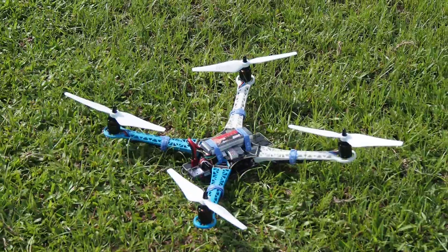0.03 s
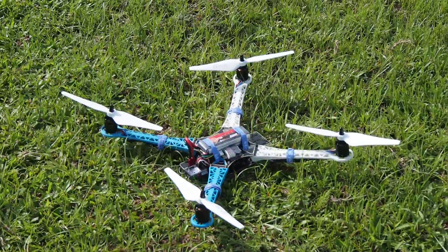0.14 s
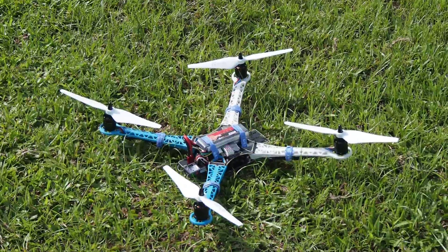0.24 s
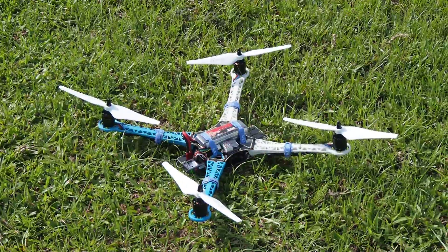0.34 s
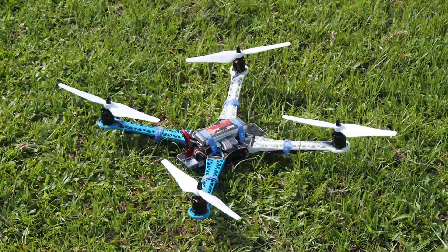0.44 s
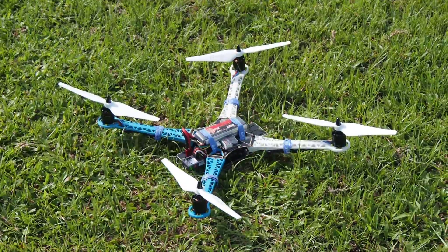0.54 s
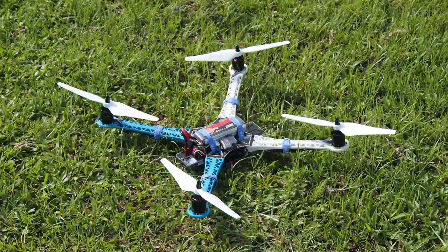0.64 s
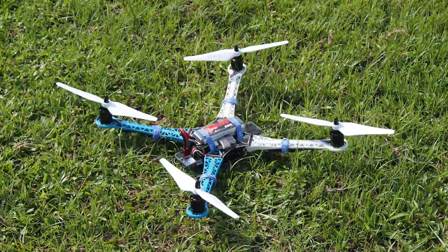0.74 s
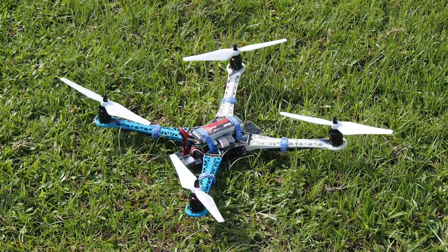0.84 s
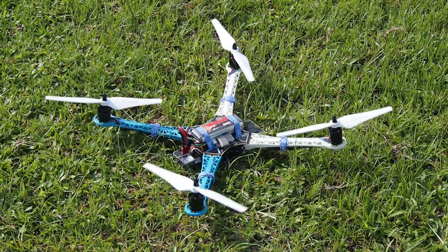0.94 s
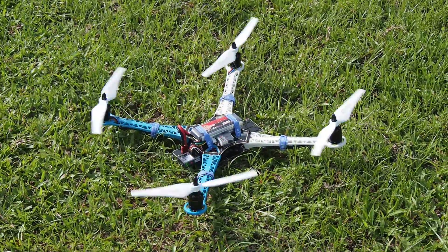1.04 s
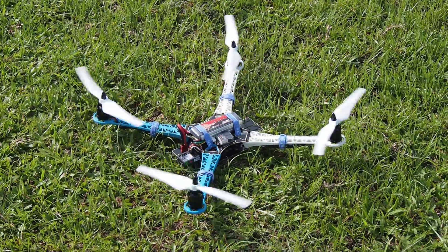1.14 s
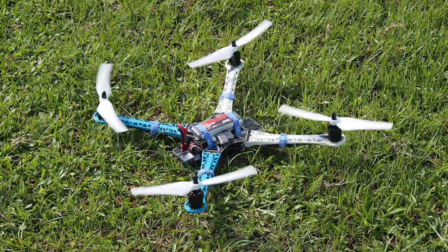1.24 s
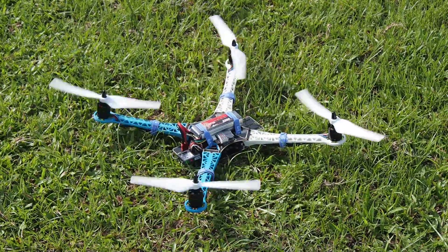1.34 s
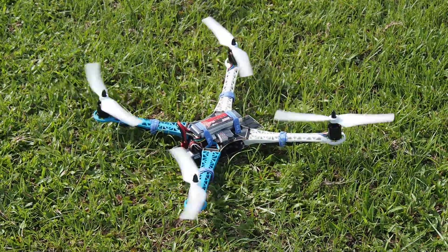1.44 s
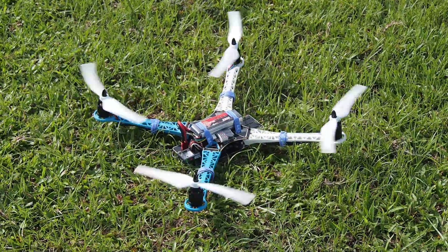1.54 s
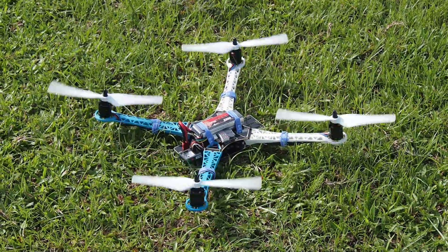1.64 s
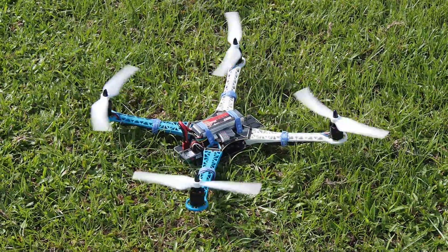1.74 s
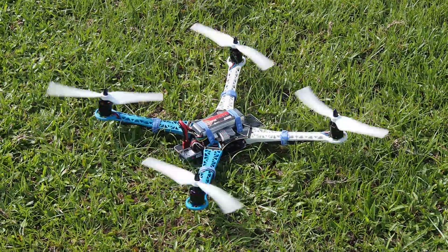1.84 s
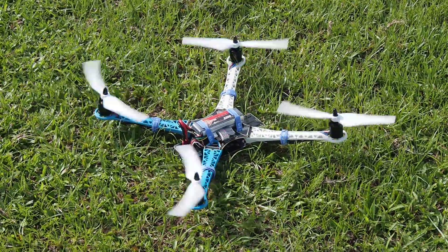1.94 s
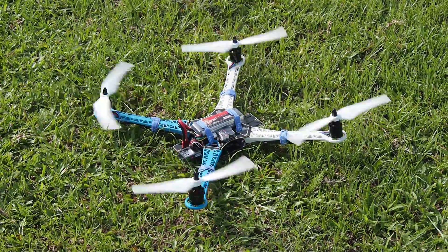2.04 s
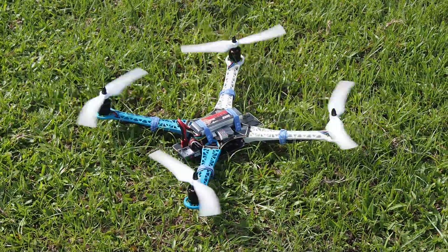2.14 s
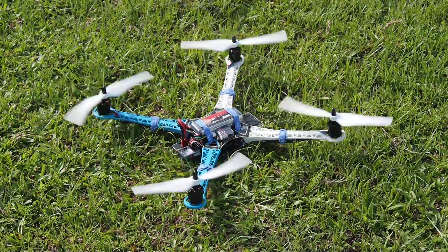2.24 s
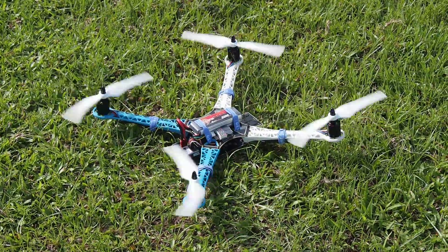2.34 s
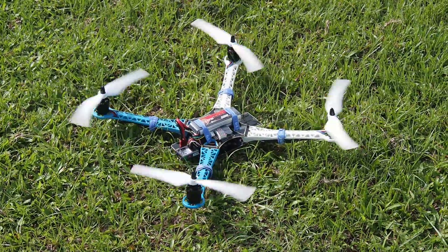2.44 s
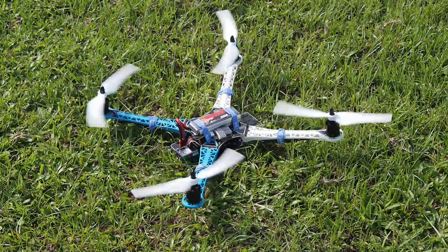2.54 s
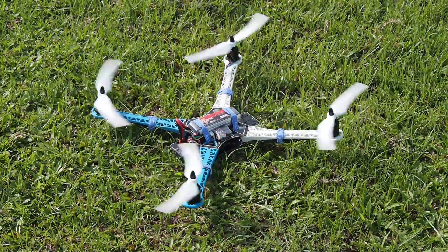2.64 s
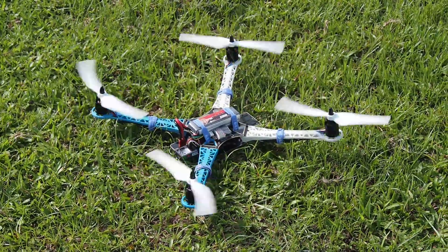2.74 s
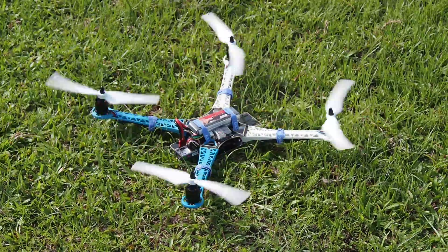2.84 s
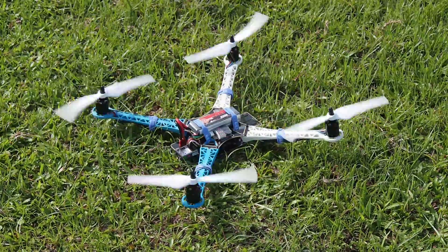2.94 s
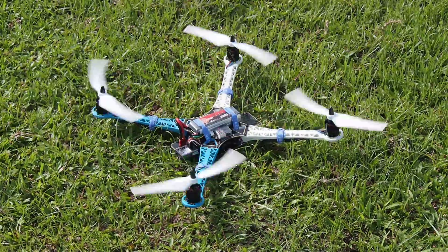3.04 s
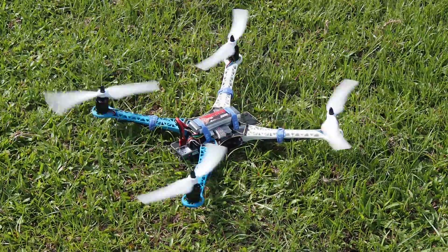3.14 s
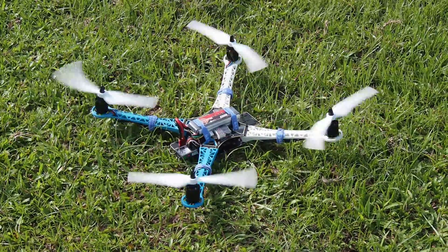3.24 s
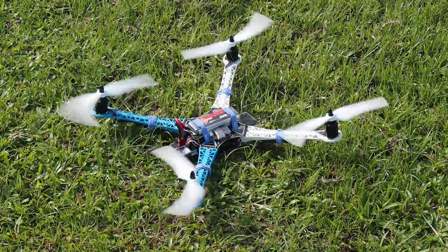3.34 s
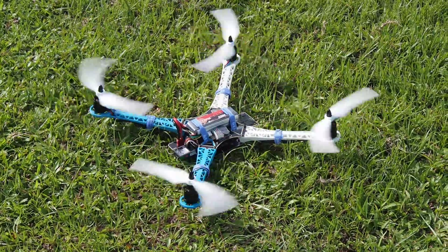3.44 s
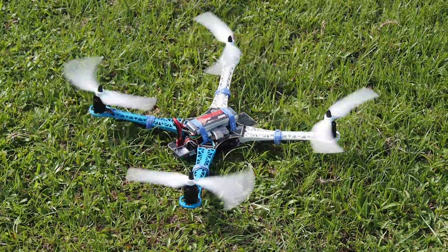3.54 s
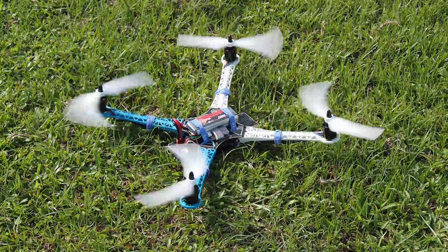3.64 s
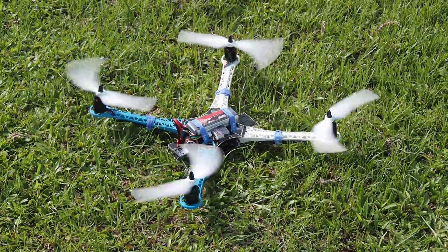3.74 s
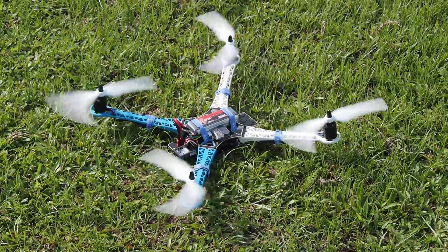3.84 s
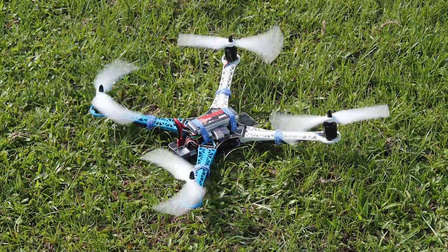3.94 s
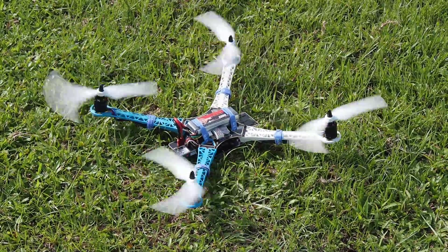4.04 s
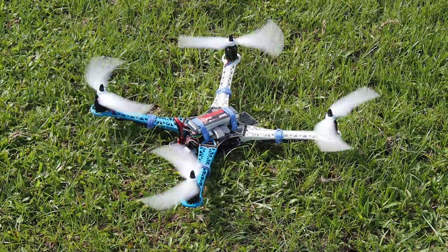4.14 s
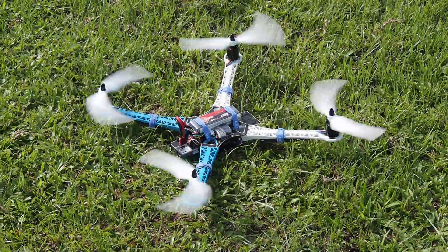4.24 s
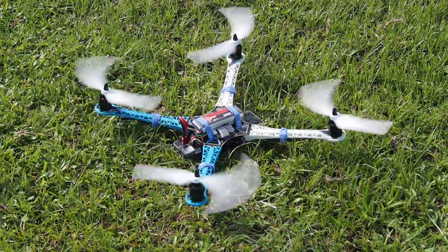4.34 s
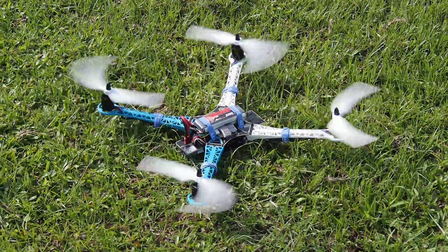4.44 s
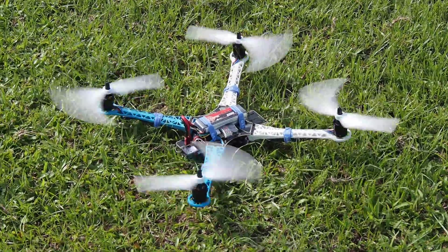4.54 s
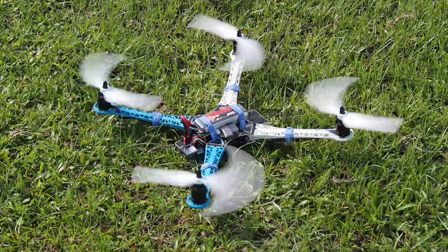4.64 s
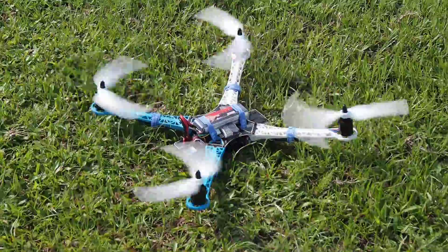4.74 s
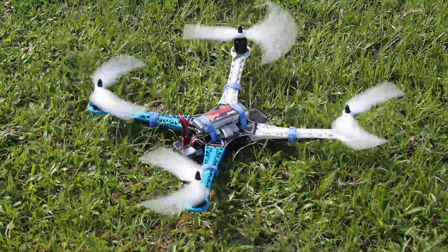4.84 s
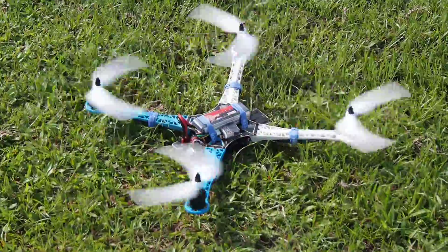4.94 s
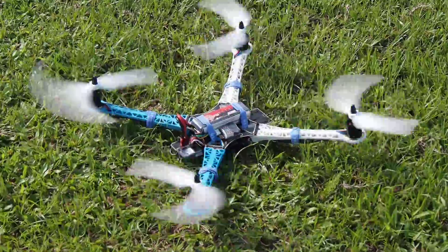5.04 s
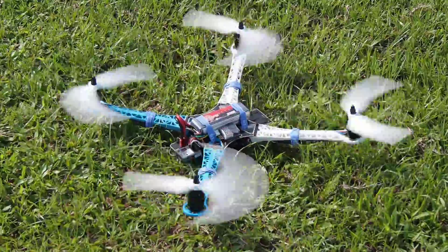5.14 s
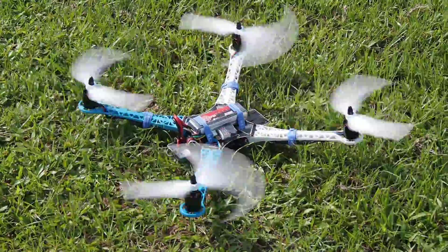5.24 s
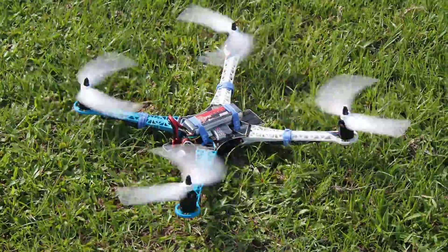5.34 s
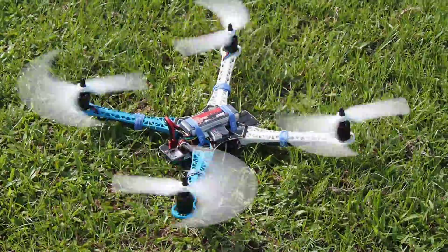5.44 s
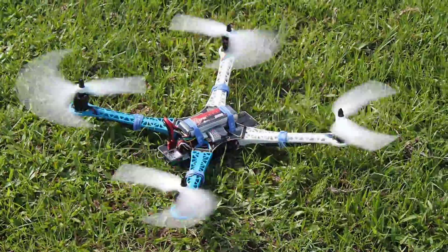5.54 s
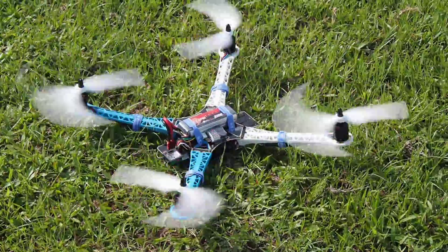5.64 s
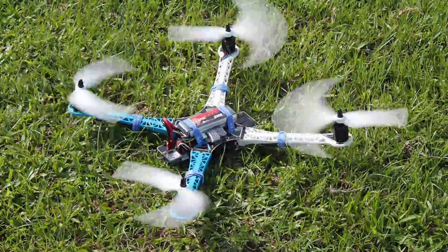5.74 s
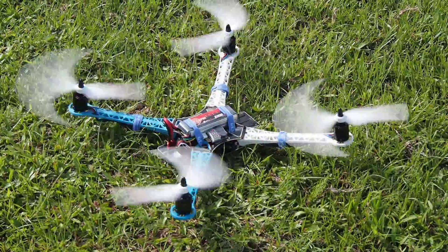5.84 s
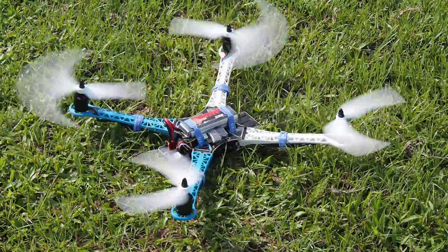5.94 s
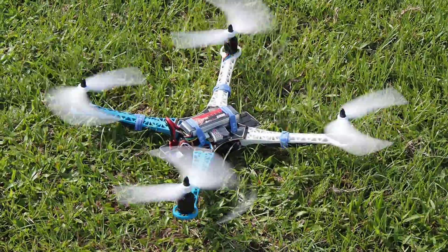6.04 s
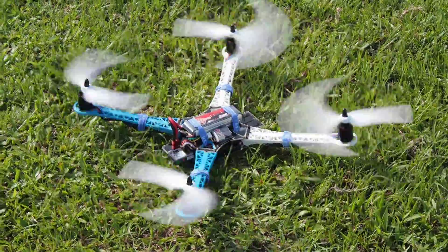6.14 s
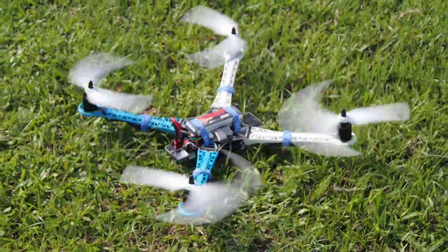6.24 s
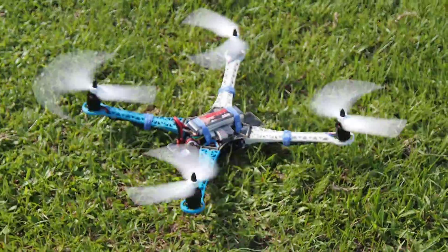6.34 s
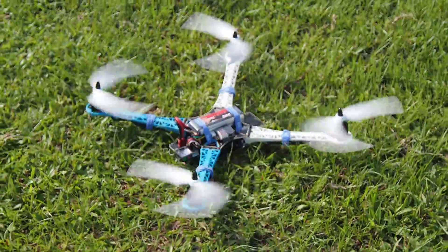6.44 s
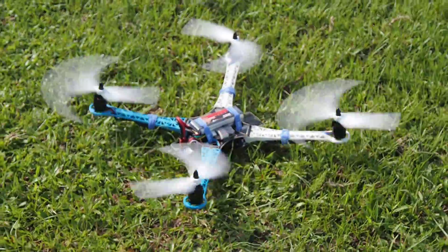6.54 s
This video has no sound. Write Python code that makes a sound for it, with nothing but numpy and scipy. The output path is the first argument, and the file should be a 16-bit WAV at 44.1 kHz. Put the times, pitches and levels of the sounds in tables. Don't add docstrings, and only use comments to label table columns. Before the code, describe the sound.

A quadcopter on grass spins up outdoors: piercing steady whine, gliding side tones, blades snapping against stalks, then airy propeller roar that swells to the end.

```python
import sys
import numpy as np
from scipy import signal
from scipy.fft import rfft, irfft, next_fast_len
from scipy.io import wavfile
from scipy.ndimage import map_coordinates

SR = 44100
rng = np.random.default_rng(int(sys.argv[2]) if len(sys.argv) > 2 else 0)


def inscribe(sig):
    pcm = np.round(np.clip(np.atleast_2d(sig).T, -1, 1) * 32767)
    wavfile.write(sys.argv[1], SR, pcm.astype(np.int16))


def boost_factor(decibels):
    exponent = np.asarray(decibels, float) / 20
    return 10 ** exponent


N = 290883
T = np.arange(N) / SR

# motor level in dB, left-right balance in dB, blade level in dB.
ROTORS = [(-3, 0, -3), (-8, -3, -1), (-7, 2, -5)]
# pitch in Hz, level in dB.
CLOCKS = [(8010.8, 0), (8015.87, -3), (8005.73, -7)]
# magnet rate in Hz, then switching tone, housing ring,
# side tones and cogging in dB.
MOTOR_LEVELS = [(10, -47, -49, -47, -72), (199, -44, -46.5, -46.5, -58), (310, -49.5, -44, -45.5, -55.5),
                (348, -45, -47.5, -47, -58.5), (465, -37, -35.5, -36.5, -58), (500, -35, -33.5, -40.5, -60),
                (740, -38.5, -37.5, -40, -50), (946, -41, -32.5, -33.5, -41), (1130, -37, -53, -39.5, -63),
                (1240, -46, -46, -43, -60)]
# offset in multiples of the shaft rate, level in dB.
SIDE_TONES = [(14, 0), (-14, -2), (1, -5), (-1, -2), (-2, -7)]
# centre in Hz, width in Hz, level in dB.
HOUSING = [(1180, 150, 0), (4682, 150, 6), (4920, 71, 4.5), (5170, 220, -8.5), (8010, 370, 5.5),
           (8570, 260, 2)]
# start and end in seconds, start and end pitch in Hz, level in dB.
SQUEALS = [(1.68, 1.78, 1540, 1555, -58), (1.81, 1.88, 2620, 2740, -51), (1.99, 2.06, 2950, 3030, -53),
           (2.17, 2.24, 2680, 2700, -56), (3.96, 4.12, 4750, 4760, -40), (4.01, 4.2, 4990, 4720, -38),
           (4.46, 4.64, 4720, 4760, -38), (4.48, 4.64, 4940, 4960, -40), (4.54, 4.63, 4630, 4570, -36),
           (4.66, 4.8, 4590, 4610, -35), (4.84, 4.92, 4590, 4610, -35), (6.02, 6.22, 4860, 5060, -37)]


def motors():
    whine_db, ring_db, side_db, cog_db = at_speed(MOTOR_LEVELS)
    in_step_s = 1.3
    waver = 0.5 * wobble(30)
    out = np.zeros((2, N))
    for angle, (motor_db, pan_db, _), (clock_hz, clock_db) in zip(shaft_angles(), ROTORS, CLOCKS):
        switching = 2 * np.pi * clock_hz * (T - in_step_s)
        whine_gain = boost_factor(whine_db + clock_db + 0.63 * wobble(5.88))
        whine = np.sqrt(2) * whine_gain * np.cos(switching + waver)
        side_tones = sum(boost_factor(level_db) * tone(switching + k * angle, drift=0.4, flutter_db=2.5, rate=25)
                         for k, level_db in SIDE_TONES)
        cogging = tone(84 * angle, drift=0.6, flutter_db=3, rate=20)
        magnets = boost_factor(motor_db + side_db) * side_tones + boost_factor(motor_db + cog_db) * cogging
        out += whine + placed(magnets, pan_db)
    ring_gain = boost_factor(ring_db + 3.5 + 0.81 * wobble(14)) * fade_in(0.72, 0.18)
    out += ring_gain * rush(resonances(HOUSING))
    out += boost_factor(3.2) * glides(SQUEALS)
    return out * fade_in(0.745, 0.016)


# magnet rate in Hz, then roar, swish, hiss and
# blade tone in dB.
AIR_LEVELS = [(10, -53, -58, -54, -61), (200, -57, -59, -56.5, -61.5), (360, -45, -58, -53.5, -62.5),
              (470, -40, -40, -49, -56.5), (612, -33, -35.5, -44, -57.5), (751, -29, -32, -42, -45.5),
              (914, -25.5, -27, -34, -40.5), (1030, -25, -27.5, -28.5, -40), (1310, -22.5, -28, -29.5, -41)]
# frequency in Hz, level in dB per Hz.
ROAR = [(59, -61), (100, -19), (155, -43), (211, -12.5), (310, -9), (415, -6), (716, 1.5), (1270, 4),
        (2190, -7), (2400, -5.5), (3120, -4.5), (5280, -120)]
SWISH = [(1300, -34), (2250, -38), (2700, -2), (3400, 2.5), (4300, -3), (4800, 0.5), (5800, 3.5),
         (7400, -5.5), (9900, -20), (16700, -120)]
HISS = [(4120, -12), (7000, -6), (7380, -3.5), (8140, 0.5), (9380, -5), (10400, -14), (14000, -31.5),
        (15200, -42), (16200, -78)]
# multiple of the blade rate, level in dB.
BLADE_TONES = [(1, -9.5), (2, -4), (3, -2.5), (4, -1), (5, -3), (6, -6.5)]


def propellers():
    roar_db, swish_db, hiss_db, tone_db = at_speed(AIR_LEVELS)
    blades = [2 * angle for angle in shaft_angles()]
    blades.append(0.97 * blades[1])
    passes = sum(np.cos(blade + wobble(12)) for blade in blades)
    gust = 0.6 * wobble(9)

    roar_gain = boost_factor(roar_db + 0.19 * gust + 0.53 * wobble(25))
    out = roar_gain * rush(shade(ROAR), gate=boost_factor(0.71 * passes))
    swish_gain = boost_factor(swish_db + 2 + 0.31 * gust + 0.39 * wobble(25))
    out += swish_gain * rush(shade(SWISH), gate=boost_factor(0.35 * passes))
    hiss_gain = boost_factor(hiss_db + 4 + 0.8 * gust + 0.5 * wobble(25))
    out += hiss_gain * rush(shade(HISS), gate=boost_factor(0.7 * passes))

    for blade, (_, pan_db, blade_db) in zip(blades, ROTORS + [(0, 0, -3)]):
        lift = sum(boost_factor(level_db) * tone(round(k) * blade, drift=1.3, flutter_db=4, rate=20)
                   for k, level_db in BLADE_TONES)
        out += placed(boost_factor(tone_db + blade_db) * lift, pan_db / 4)
    return lawn_echo(out) * fade_in(0.75, 0.31)


def lawn_echo(x):
    dip_hz, width_hz, depth = 476, 30, 0.61
    return filtered(x, lambda hz: 1 - depth / (1 + ((hz - dip_hz) / width_hz) ** 2))


# time in seconds, then magnet passing rate in Hz (14 a turn) of the
SPIN = [(.74, 10, 10, 10), (.9, 125, 110, 95), (1.1, 205, 180, 160), (1.5, 290, 260, 225),
        (2, 342, 315, 283), (2.5, 364, 345, 315), (2.95, 372, 365, 335), (3.15, 555, 400, 350),
        (3.35, 735, 560, 480), (3.5, 790, 665, 580), (3.8, 800, 790, 655), (4.08, 815, 810, 665),
        (4.45, 995, 975, 835), (4.9, 1105, 1050, 945), (5.15, 1135, 1095, 1050), (5.85, 1200, 1125, 1085),
        (6.05, 1225, 1225, 1190), (6.2, 1265, 1248, 1217)]


def shaft_angles():
    return [2 * np.pi * np.cumsum(hz / 14) / SR for hz in curves(SPIN)]


def at_speed(rows):
    speed, *columns = np.transpose(rows)
    mean_hz = np.mean(curves(SPIN), axis=0)
    return [np.interp(mean_hz, speed, column) for column in columns]


# time in seconds, peak in dB, high ring in dB, low ring in dB.
FLICKS = [(1.1782, -26.5, -15, 3.5), (1.2524, -27, -11.5, -4), (1.32, -29.5, -13, -20),
          (1.4111, -24, -14, -1), (1.4975, -21, -10, 1.5), (1.5575, -32.5, -23, -20),
          (1.84, -29.5, -16, -17), (1.9325, -24, -15, -6), (2.004, -22.5, -29, -9), (2.073, -23, -13, -24),
          (2.164, -21, -11.5, -4.5), (2.232, -18.5, -10.5, 1), (2.3019, -21, -16, 0),
          (2.371, -35, -48, -29), (2.4622, -29, -17, -6), (2.5288, -28.5, -10.5, 0), (2.5972, -26, -26, -3),
          (2.6637, -26, -16, -1), (2.8168, -27.5, -26, -2), (2.9023, -21.5, -15, -8),
          (2.9668, -23, -13.5, -7), (3.031, -34, -14, 2), (3.1167, -33, -13, -12), (3.1794, -23.5, -18, -7),
          (3.2194, -26.5, -13, 2), (3.269, -32, -8, 3), (3.331, -24, -24, -20), (3.401, -29, -17, -8),
          (4.6117, -45.5, -6, -3), (5.283, -15.5, -16, -28)]
# first touch in seconds, number of touches, peak in dB.
BRUSHES = [
    (.0074, 1, -44),
    (1.637, 1, -35),
    (5.165, 1, -34),
    (6.475, 1, -30),
    (1.6285, 6, -34),
    (2.248, 1, -38),
    (2.7096, 1, -38),
    (2.7302, 1, -33),
]
# frequency in Hz, level in dB.
SNAP = [(600, -13), (1800, -9.5), (3200, -6), (4500, -5), (6500, -4.5), (8700, 3.5), (10000, -8),
        (11200, -5), (12500, -24.5), (14200, -13), (16500, -44)]
# pitch in Hz, level in dB, 60 dB decay in seconds.
HIGH_RING = [(2541, 1, 0.064), (2290, -10.5, 0.084)]
LOW_RING = [(1100, -2.5, 0.093), (1367, -8, 0.085)]


def flicks():
    gap_s = 0.036
    hits = [(*row, -7.5) for row in FLICKS]
    for first_s, touches, db in BRUSHES:
        hits += [(first_s + k * gap_s, db, -17, -13, -4) for k in range(touches)]

    t = np.arange(SR // 8) / SR
    snaps, rings = np.zeros((2, N + SR)), np.zeros((2, N + SR))
    for s, db, high_db, low_db, pan_db in hits:
        i = round(s * SR)
        shared, own = rng.standard_normal(len(t)), rng.standard_normal((2, len(t)))
        snap_shape = boost_factor(-60 * t / 0.015) * (1 - np.exp(-t / 0.00089))
        burst = (shared + 0.5 * own) * snap_shape
        snaps[:, i:i + len(t)] += placed(boost_factor(db + 13.5) * burst, pan_db + 5.5)
        body = boost_factor(high_db + 3.5) * blade_ring(HIGH_RING, t) + boost_factor(low_db - 6.5) * blade_ring(LOW_RING, t)
        body = body * (1 - np.exp(-t / 0.00051))
        rings[:, i:i + len(t)] += placed(boost_factor(db) * body, pan_db + 7)
    return filtered(snaps[:, :N], shade(SNAP)) + rings[:, :N]


def blade_ring(modes, t):
    return sum(boost_factor(db + rng.normal(0, 1) - 60 * t / t60) * np.sin(2 * np.pi * hz * t)
               for hz, db, t60 in modes)


def surroundings():
    return cicadas() + far_away() + bump()


# centre in Hz, width in Hz, level in dB.
CHORUS = [(5620, 890, -10.5), (6420, 660, -7), (7260, 500, -6.5), (8260, 650, -24)]
# time in seconds, level in dB.
CHORUS_LEVEL = [
    (0, -41.5),
    (.4, -39),
    (1.2, -44),
    (2.4, -38.5),
    (6.6, -42),
]
# start and end in seconds, start and end pitch in Hz, level in dB.
PEEPS = [
    (0, .62, 2390, 2440, -69),
    (1.08, 1.5, 2400, 2400, -59.5),
]
# frequency in Hz, left-right likeness from 0 to 1.
FAR_ALIKE = [(60, 0.92), (150, 0.97), (380, 0.84), (950, 0.6), (2380, 0.011), (5980, 0.91), (15000, 0.0)]


def cicadas():
    clicks = np.exp(0.7 * np.cos(2 * np.pi * 367 * T + 0.6 * wobble(9)))
    song = rush(resonances(CHORUS), gate=clicks, alike=FAR_ALIKE)
    song = filtered(song, lambda hz: 1 / (1 + (5150 / (hz + 1)) ** 40))
    return boost_factor(curves(CHORUS_LEVEL)[0] + 0.28 * wobble(21)) * song + glides(PEEPS)


# frequency in Hz, level in dB per Hz.
FAR = [(18, -40), (30, -2), (60, -4.5), (190, -4), (400, -12), (1100, -17.5), (2000, -23), (4200, -31.5),
       (9000, -39), (16000, -49)]
# pitch in Hz, rms level in dB.
HUM = [(37, -59.5), (71, -53)]
# time in seconds, gain in dB.
DUCK = [
    (0, 2),
    (3.5, 2),
    (4.5, 1.5),
    (5.5, -3),
    (6.6, -7),
]


def far_away():
    rumble = boost_factor(-44.5 + 1.2 * wobble(3.98)) * rush(shade(FAR), alike=FAR_ALIKE)
    hum = sum(boost_factor(db) * tone(2 * np.pi * hz * T, drift=0.14, flutter_db=1.5, rate=6) for hz, db in HUM)
    return boost_factor(curves(DUCK)[0]) * (rumble + hum)


def bump():
    swell = np.exp(-((T - 0.032) / 0.018) ** 4)
    low = np.cos(2 * np.pi * 124 * (T - 0.0275))
    high = 0.52 * np.cos(2 * np.pi * 190 * (T - 0.028))
    return boost_factor(-28.5) * swell * (low + high)


def tone(phase, drift, flutter_db, rate):
    level = np.sqrt(2) * boost_factor(flutter_db * wobble(rate))
    return level * np.sin(phase + drift * wobble(rate) + rng.uniform(0, 2 * np.pi))


def glides(rows):
    out = np.zeros(N)
    for start, end, from_hz, to_hz, db in rows:
        u = np.clip((T - start) / (end - start), 0, 1)
        phase = 2 * np.pi * np.cumsum(from_hz + (to_hz - from_hz) * u) / SR
        swell = np.sqrt(np.abs(np.sin(np.pi * u))) * (u < 1)
        out += boost_factor(db) * swell * tone(phase, drift=0.9, flutter_db=2.5, rate=30)
    return out


# frequency in Hz, left-right likeness from 0 to 1.
ALIKE = [(60, 1), (180, 1), (550, 0.95), (1650, 0.99), (4970, 0.95), (15000, 0.25)]


def rush(gain, gate=1, alike=ALIKE):
    def turn(hz):
        return np.arccos(np.clip(along(alike, hz), 0, 1)) / 2
    pair = gate * rng.standard_normal((2, N))
    mid, side = filtered(pair, lambda hz: gain(hz) * [np.cos(turn(hz)), np.sin(turn(hz))])
    return unit(np.array([mid + side, mid - side]))


def resonances(modes):
    return lambda f: np.sqrt(sum((boost_factor(db) / (1 + (2 * (f - hz) / width) ** 2)) ** 2
                                 for hz, width, db in modes))


def shade(spectrum):
    return lambda hz: boost_factor(along(spectrum, hz))


def filtered(x, response):
    m = next_fast_len(N + 8192)
    return irfft(rfft(x, m) * response(np.fft.rfftfreq(m, 1 / SR)), m)[..., :N]


def along(points, hz):
    f, v = np.transpose(points)
    return np.interp(np.log(hz + 1), np.log(f + 1), v)


def curves(rows):
    s, *columns = np.transpose(rows)
    return [np.interp(T, s, column) for column in columns]


def wobble(rate):
    return map_coordinates(rng.standard_normal(int(N * rate / SR) + 4), [T * rate])


def fade_in(start_s, length_s):
    return np.clip((T - start_s) / length_s, 0, 1)


def placed(x, pan_db):
    return x * boost_factor([[pan_db / 2], [-pan_db / 2]])


def unit(x):
    return x / np.sqrt(np.mean(x ** 2) + 1e-20)


def scene():
    return motors() + propellers() + flicks() + surroundings()


# frequency in Hz, left over right in dB.
LEAN = [(60, -3.5), (150, -3.5), (380, -3.5), (950, -3.5), (2380, -5.5), (5980, -6.5), (15000, -5.5)]


def microphones(x):
    return filtered(x, lambda hz: boost_factor(np.outer([0.5, -0.5], along(LEAN, hz))))


def top_cut(x):
    return signal.sosfilt(signal.butter(12, 15800, fs=SR, output="sos"), x)


def record(dry):
    x = microphones(dry)
    since = T - 5.288
    duck_db = -4 * (since > 0) * np.exp(-np.abs(since) / 0.029)
    return top_cut(x * boost_factor(duck_db))


dry = scene()
out = record(dry)
inscribe(out)
```